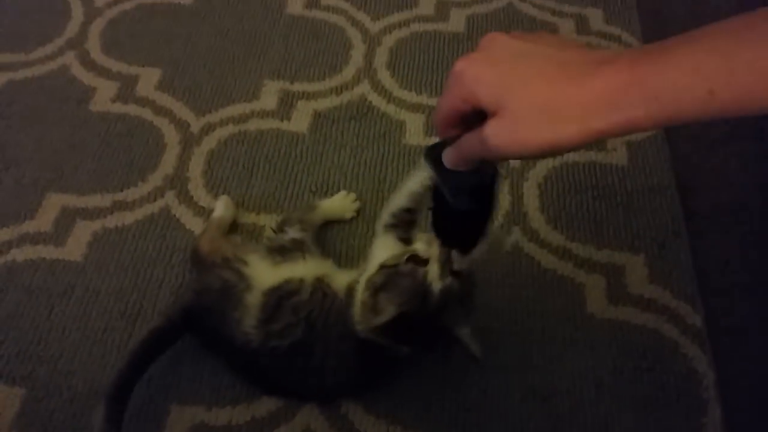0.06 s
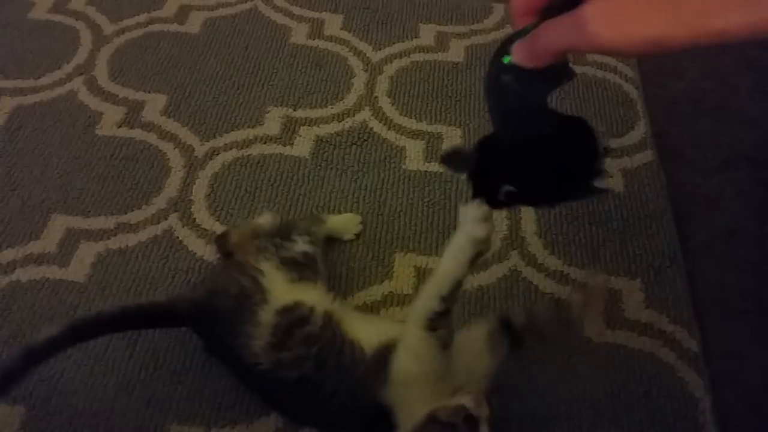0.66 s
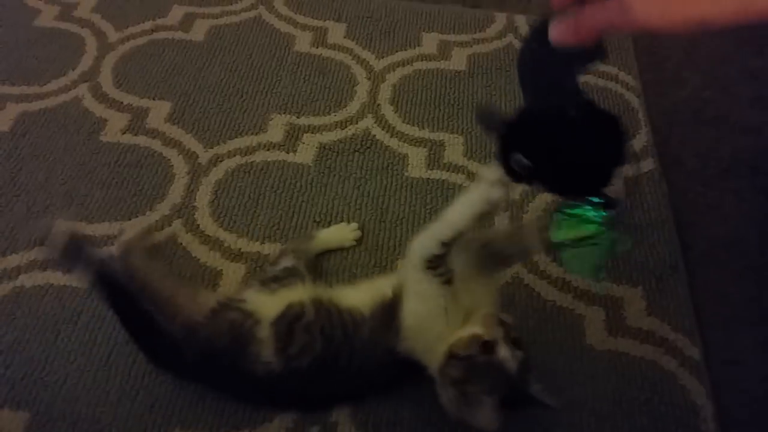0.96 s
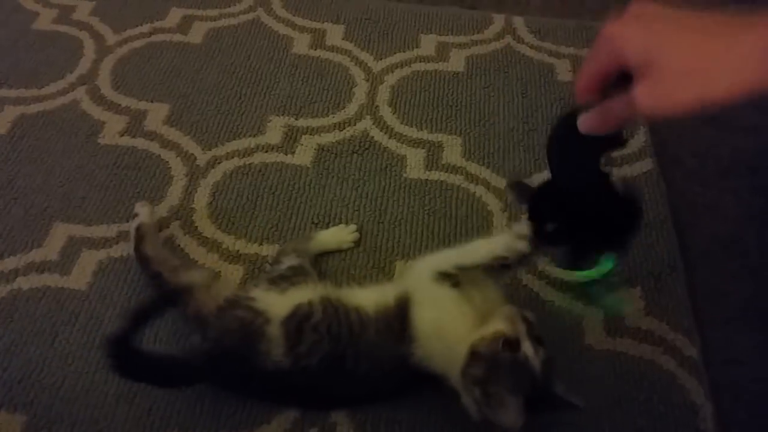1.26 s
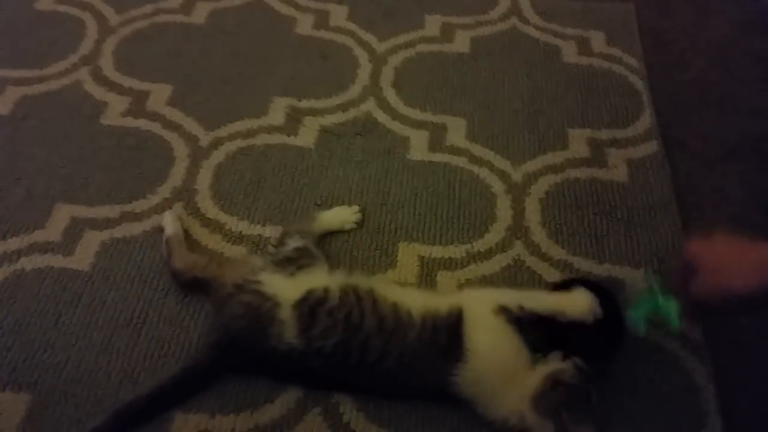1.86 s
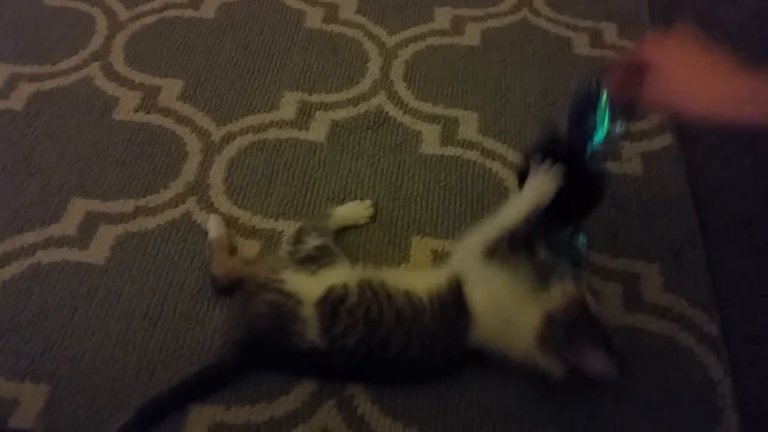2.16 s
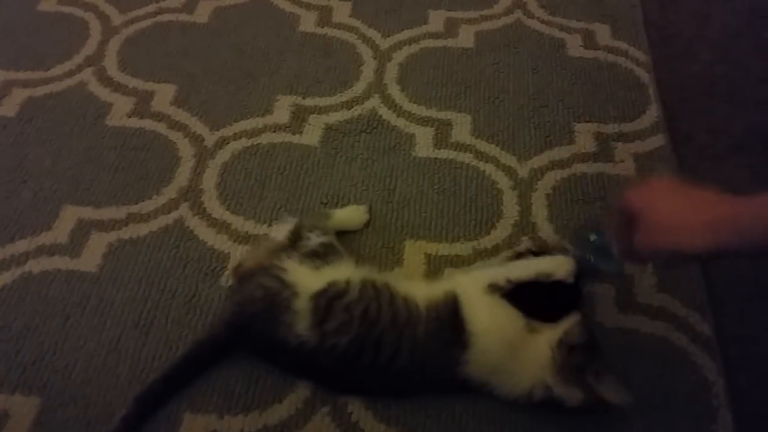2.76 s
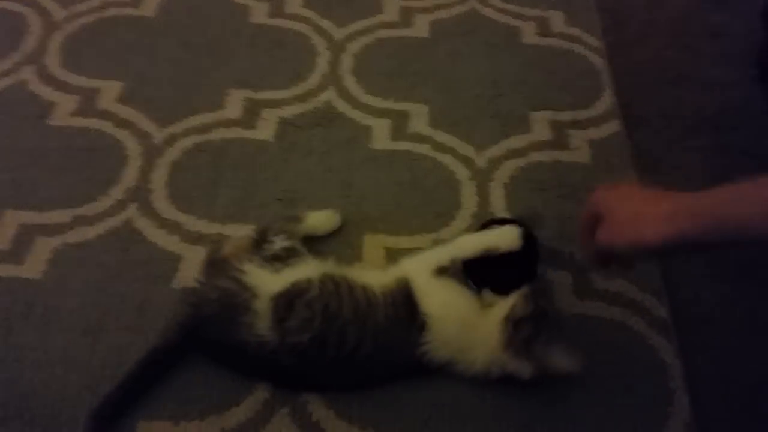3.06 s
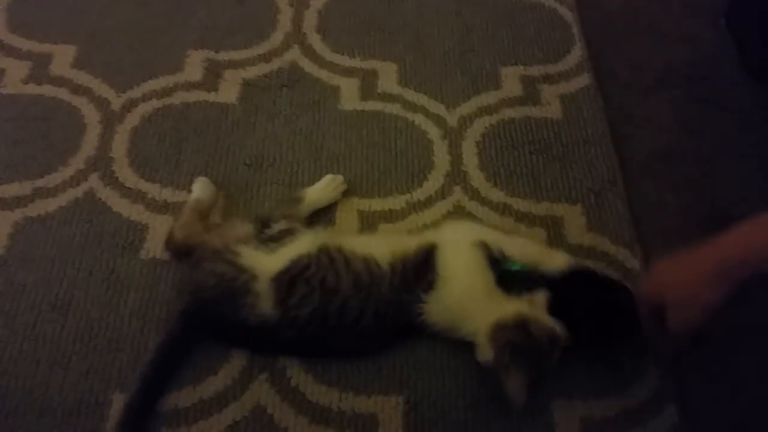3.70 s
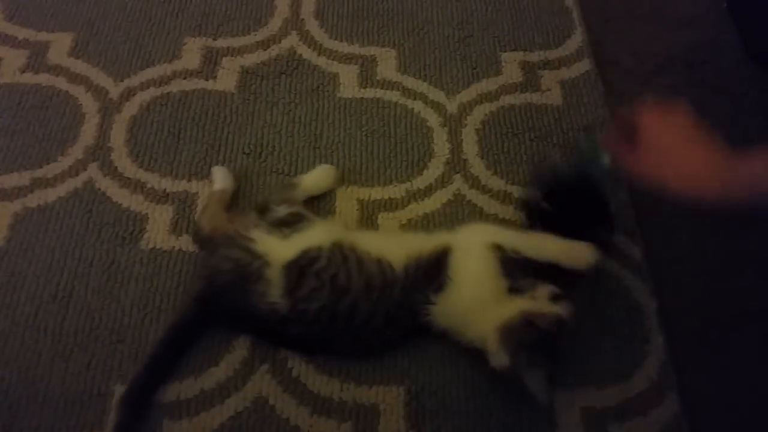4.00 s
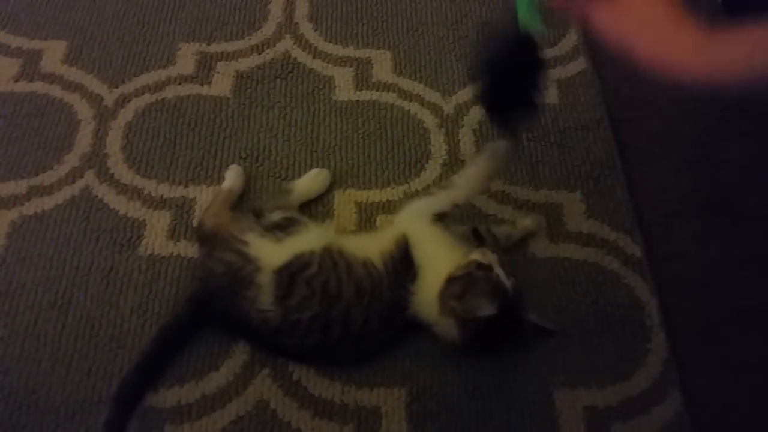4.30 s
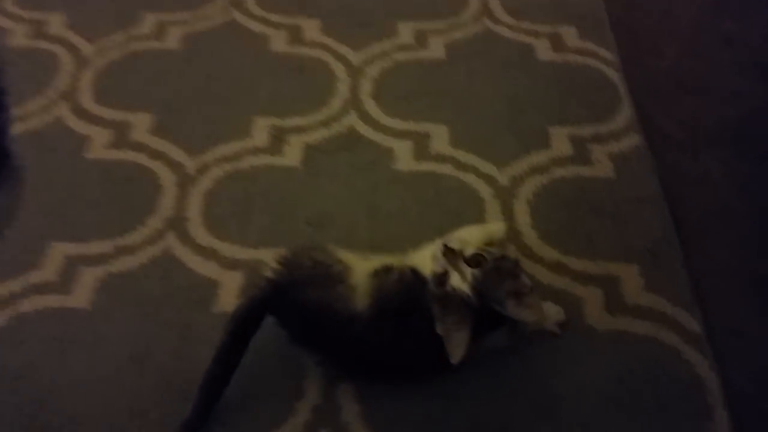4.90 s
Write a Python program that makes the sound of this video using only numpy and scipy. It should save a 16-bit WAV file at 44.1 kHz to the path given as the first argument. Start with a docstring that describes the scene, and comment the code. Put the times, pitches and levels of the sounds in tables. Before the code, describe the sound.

A kitten plays with a foil-winged toy on a rug, heard close up in a small living room. A sharp crinkle comes right at the start, followed by scattered bright snaps, light claw taps and a few small plastic clicks until about 1.6 seconds. From 1.7 seconds the foil crackles in quick, dense bursts, strongest between about 2.4 and 3 seconds, with fur and claws scuffing the rug and occasional soft, hollow paw knocks on the stuffed body. The crinkling loosens after 3.5 seconds. At 4 seconds the toy swings with a short, airy swish and a few more crackles. A plastic click follows near 4.4 seconds, then a fainter swish, isolated snaps and light taps until just past 5 seconds. A low ventilation rumble and faint hiss run throughout.

```python
"""Kitten wrestling a foil-winged toy

Close up, a kitten tugs a dangled toy on a rug. Each tug buckles the foil wings in sharp, ringing
snaps over a finer crackle, and swings slide them together in a swish. Claws tap the toy and ping its
plastic core, paws knock its stuffed body, fur scuffs on toy and rug. A small living room answers,
with ventilation rumble and a faint hiss behind."""
import sys
import numpy as np
from scipy import signal
from scipy.fft import rfft, irfft, next_fast_len
from scipy.io import wavfile
from scipy.ndimage import map_coordinates

SR = 44100
rng = np.random.default_rng(int(sys.argv[2]) if len(sys.argv) > 2 else 0)


def file_out(sig):
    """Save sig as 16-bit WAV at sys.argv[1]."""
    # one column per channel
    cols = np.atleast_2d(sig).T
    # limit, then scale
    lim = np.clip(cols, -1, 1)
    pcm = np.round(lim * 32767).astype(np.int16)
    wavfile.write(sys.argv[1], SR, pcm)


N = 227051

# fader ride on the ventilation: t/s, level/dB
VENT_RIDE = [(0, -34.5), (0.25, -38), (1.0, -36.5), (1.35, -38.5), (1.62, -36.5), (2.7, -37.5), (2.85, -40),
             (3.8, -43.5), (4.1, -43.5), (4.5, -40.5), (4.56, -38), (5.15, -36.5)]
# ventilation rumble EQ: f/Hz, level/dB
RUMBLE_EQ = [(12, -35), (22, -4.5), (33, -40), (53, -15), (66, -1.5), (86, -5), (108, 1), (135, -5.5),
             (162, -4.5), (180, -11.5), (210, -12.5), (340, -22.5), (600, -30.5), (1000, -57.5)]
# ventilation hiss EQ: f/Hz, level/dB
HISS_EQ = [(290, -13), (550, -1.5), (850, -4.5), (1300, -11), (1750, -16), (2050, -18.5), (3600, -26),
           (4650, -15.5), (5600, -31), (7500, -40), (9800, -23), (15500, -21)]
# ventilation tones: f/Hz, level/dB
HUM_TONES = [(118.4, -45), (193.8, -60.5)]
# how alike the ambience is left and right: f/Hz, correlation
STEREO_LIKENESS = [(60, 0.98), (140, 0.99), (260, 0.81), (500, 0.5), (1200, 0), (3000, 0)]
# pan of the action: t/s, left minus right/dB
PAN = [(0, -1.5), (1.2, -3), (2, -3), (3, -4), (4.4, -2.5), (4.56, -3), (4.88, 12), (5.15, 1)]
# tugs crumpling the foil: t/s, hold/s, level/dB
FOIL_TUGS = [(0.022, .03, -54), (0.519, 0.023, -53.5), (0.606, 0.027, -59), (1.037, 0.031, -63),
             (1.251, 0.054, -61), (1.383, .07, -62.5), (1.476, 0.027, -56), (1.625, .06, -62),
             (1.685, 0.062, -50.5), (1.802, 0.13, -49), (2.01, 0.035, -51), (2.096, 0.017, -43.5),
             (2.17, 0.078, -45.5), (2.31, 0.16, -45.5), (2.519, 0.12, -45.5), (2.661, 0.13, -54),
             (2.749, 0.069, -43.5), (2.83, 0.078, -44.5), (2.96, 0.093, -48.5), (3.095, 0.055, -50),
             (3.161, 0.12, -47.5), (3.402, 0.097, -51), (3.561, 0.15, -57), (3.973, 0.094, -52),
             (4.126, 0.058, -77), (4.27, 0.17, -66), (4.54, 0.018, -60.5), (4.85, 0.19, -61.5)]
# fine foil crackle EQ: f/Hz, level/dB
CRACKLE_EQ = [(500, -33), (1500, -17), (2300, -1.5), (3500, -0.5), (7500, -5.5), (9700, -0.5), (12000, -2),
              (15500, -6)]
# fur and claws scuffing toy and rug: t/s, level/dB
SCUFF_RIDE = [(0, -52), (0.35, -61), (0.62, -56), (0.8, -58), (1.15, -57), (1.3, -53.5), (1.6, -56.5),
              (1.75, -55), (2.3, -49), (2.5, -56), (2.66, -56), (2.78, -43), (3.0, -52.5), (3.45, -68),
              (3.7, -82), (4.05, -58), (4.3, -80), (5.15, -58)]
# scuff EQ: f/Hz, level/dB
SCUFF_EQ = [(200, 13), (500, 11.5), (900, 16), (1750, 12.5), (2200, -1), (4500, 4), (7000, -39),
            (16000, -17)]
# featured creases snapping through: t/s, ring level/dB, crack level/dB, ring f/Hz
FOIL_SNAPS = [(0.02, -44, -44, 10000), (0.028, -38.5, -43.5, 10300), (0.078, -50, -55, 15200),
              (0.2973, -57, -62, 10700), (0.519, -45, -49.5, 11900), (0.524, -42.5, -52, 12600),
              (0.543, -44, -50, 13400), (0.625, -42, -58, 11300), (0.6651, -40.5, -61, 8500),
              (0.9589, -46, -47, 13300), (1.0789, -40, -51.5, 15200), (1.1868, -25.5, -53, 10900),
              (1.273, -36.5, -47, 10200), (1.3106, -33.5, -56, 9900), (1.381, -46, -51, 9900),
              (1.395, -44, -53, 9400), (1.496, -42, -40, 10200), (1.502, -26.5, -43.5, 10300),
              (1.633, -36, -40, 11200), (1.701, -35, -43, 8900), (1.7188, -30, -30.5, 10400),
              (1.7616, -30.5, -50, 9200), (1.8117, -27.5, -31.5, 9900), (1.815, -36, -36, 12100),
              (1.8379, -34, -38, 9600), (1.844, -34, -37, 12100), (1.8559, -40, -37, 9200),
              (1.8637, -18.5, -59, 10900), (1.879, -22.5, -34, 10300), (1.912, -34, -36.5, 10300),
              (1.9183, -38, -36, 10200), (1.933, -37, -42, 12200), (1.94, -27.5, -35, 9700),
              (2.0172, -35, -34.5, 9600), (2.0278, -24.5, -31.5, 12800), (2.0906, -39, -34.5, 8400),
              (2.112, -43, -42, 14500), (2.1208, -44, -40, 10300), (2.19, -28.5, -35.5, 11170),
              (2.2358, -31.5, -34.5, 11500), (2.3444, -34, -35, 8660), (2.358, -35, -37, 8900),
              (2.3916, -25.5, -37, 9400), (2.4282, -28, -32, 10100), (2.4377, -29, -32, 10200),
              (2.456, -34.5, -32.5, 8800), (2.524, -25, -28, 9700), (2.5323, -26, -31, 13900),
              (2.5356, -24.5, -32, 10400), (2.5624, -28, -34, 9400), (2.5789, -27, -44, 9900),
              (2.587, -33, -37, 9700), (2.6034, -30, -31, 11380), (2.644, -55, -38, 10200),
              (2.763, -38, -42, 12200), (2.792, -28.5, -28.5, 12700), (2.8263, -27, -35, 10250),
              (2.8421, -27, -35, 9550), (2.8465, -26.5, -31.5, 9600), (2.864, -31, -43, 10300),
              (2.9027, -25.5, -34.5, 9100), (2.9082, -24.5, -33, 10000), (2.9157, -34, -35, 9400),
              (2.9608, -36, -38, 9030), (2.982, -31.5, -31.5, 9720), (2.9949, -25.5, -31, 14200),
              (3.0305, -31.5, -47, 9000), (3.0851, -31, -42, 12500), (3.088, -31, -35.5, 9600),
              (3.158, -23.5, -33, 10100), (3.1642, -27, -42, 9500), (3.1953, -32.5, -36.5, 9700),
              (3.224, -40, -41, 9400), (3.243, -34, -56, 13800), (3.2525, -28.5, -40, 9600),
              (3.2576, -31.5, -32, 10000), (3.2969, -37, -34.5, 10200), (3.3134, -31, -39, 11630),
              (3.344, -29.5, -37, 9700), (3.3578, -25.5, -42.5, 13900), (3.373, -34, -46, 13200),
              (3.4083, -31, -41.5, 12600), (3.4317, -34, -37, 9600), (3.4356, -25.5, -40.5, 12800),
              (3.4818, -33.5, -44, 14900), (3.51, -32.5, -42.5, 9700), (3.62, -38, -54, 10500),
              (3.661, -44, -65, 12560), (3.697, -35, -51, 11430), (3.7036, -33.5, -46, 14200),
              (3.8507, -34.5, -55, 14000), (3.8594, -40.5, -46.5, 10200), (3.9333, -47, -52, 11340),
              (4.0, -31, -50, 9900), (4.0146, -32.5, -37.5, 10100), (4.0657, -34.5, -42.5, 9900),
              (4.1384, -34, -45, 10100), (4.1666, -42, -38.5, 9800), (4.2034, -36.5, -55, 9800),
              (4.5519, -31, -42, 11400), (4.8821, -30, -35, 9500), (4.9486, -47, -51, 10100),
              (5.0082, -35, -49.5, 9100)]
# a snap's top layer, the bright ring: f/Hz, level/dB
RING_EQ = [(3000, -63), (7000, -16), (9000, 4.5), (12000, 3), (15500, 0)]
# a snap's middle layer, the crack: f/Hz, level/dB
CRACK_EQ = [(900, -25), (2300, -7.5), (3400, -0.5), (7500, 1), (9500, 1.5), (14000, -50.5)]
# a snap's low layer, the sheet's dull flex: f/Hz, level/dB
FLEX_EQ = [(200, -7), (600, -7.5), (1100, -1.5), (1700, 6.5), (2200, -4.5), (3200, -7.5), (6000, -52.5)]
# claws and teeth tapping the toy, duller than a snap: t/s, level/dB
CLAW_TAPS = [(0.024, -47), (0.2985, -50), (0.3476, -54.5), (0.3671, -53.5), (0.3872, -54.5),
             (0.4819, -47.5), (0.614, -47), (0.6456, -44.5), (0.6662, -47.5), (0.898, -55), (0.917, -54),
             (0.951, -45.5), (1.013, -53), (1.074, -49.5), (1.2615, -50), (1.272, -42.5), (1.306, -49),
             (1.3106, -41), (1.404, -48.5), (1.4915, -45.5), (1.705, -43.5), (1.7228, -44), (1.9336, -44.5),
             (2.1706, -47), (2.1894, -40), (2.3217, -39), (2.494, -37), (2.535, -37.5), (2.7522, -45.5),
             (2.7915, -42), (3.773, -49.5), (3.8221, -47.5), (4.1374, -45.5), (4.2033, -55.5),
             (4.2672, -53.5), (4.565, -55), (4.751, -49.5), (4.766, -54), (5.049, -52), (5.0792, -52),
             (5.105, -48), (5.136, -51.5)]
# claws pinging the hard plastic core: t/s, level/dB, f/Hz
CORE_CLICKS = [(0.0243, -47, 5050), (0.3028, -55.5, 4440), (0.653, -39.5, 4360), (1.0584, -49, 3700),
               (1.272, -39, 4700), (4.4092, -34, 4700), (5.1056, -40, 4010)]
# reverb send, lower when the toy is near: t/s, level/dB
ROOM_SEND = [(0, -8), (1.2, -11.5), (2, -9.5), (3.4, -10), (4.15, -10.5), (4.45, -6), (4.85, -15.5),
             (5.15, -15)]
# room decay: f/Hz, t60/s
ROOM_DECAY = [(300, 0.04), (2000, 0.46), (5000, 0.27), (10000, 0.26), (16000, 0.19)]
# the toy swung through the air: peak t/s, half width/s, level/dB
TOY_SWINGS = [(0.553, 0.03, -61), (4.008, 0.034, -40.5), (4.77, 0.041, -51.5)]
# EQ of the wings sliding over each other: f/Hz, level/dB
SWISH_EQ = [(2000, -53), (6000, -6), (10000, 8), (15500, 6)]
# paws knocking the toy's body: t/s, level/dB, f/Hz
PAW_KNOCKS = [(1.271, -34.5, 800), (1.3117, -46, 900), (1.813, -42, 655), (1.925, -40, 700),
              (2.643, -39, 980), (2.825, -32, 760), (3.296, -40.5, 868), (3.312, -42, 676),
              (3.478, -40.5, 920)]

TOP_HZ = 15950  # band limit of the mix
TUG_ATTACK_S, RELAX_DB_PER_S = .015, 230  # the foil tightens quickly and relaxes more slowly
RESTING_DB, SLACK_DB = -90, -62  # strain of the hanging toy; strain needed for small snaps
SMALL_PER_S, SMALL_SCATTER_DB = 45, 2  # small snaps: rate while tugged, level spread
SMALL_RING_DB, SMALL_CRACK_DB = 4.5, -5  # their ring against the strain, crack against the ring
RING_HZ, RING_SCATTER = 10500, 0.14  # the foil's usual ring; log spread among small snaps
CRACK_HZ, CRACK_SCATTER, CRACK_PEAK_DB = 6310, 0.11, 6.5  # crack resonance: pitch, log spread, height
FLEX_DB, TYPICAL_CRACK_DB = -51.5, -40  # the flex that goes with a typical crack
FLEX_GROWS, FLEX_SCATTER = 0.84, 0.12  # dB of flex per dB of crack; log pitch spread across the toy
TAP_RING_DB, TAP_CRACK_DB = -5, -5  # against the tap's flex
TAP_HZ, TAP_PEAK_DB = 4160, 13  # a tap's resonance
CLICK_RING_DB, CLICK_FLEX_DB, CLICK_PEAK_DB = -3, -15.5, 8.5  # two layers against the ping; its height


def amp(db):
    """Decibels to gain."""
    return 10 ** (np.asarray(db) / 20)


def unit(x):
    """Scale to rms 1."""
    return x / np.sqrt(np.mean(x ** 2) + 1e-20)


def along(points, hz):
    """Read (f/Hz, value) points on a log axis."""
    f, values = np.transpose(points)
    return np.interp(np.log(hz + 1), np.log(f + 1), values)


def ride(points):
    """An automation lane: (t/s, value) points to one value per sample."""
    return np.interp(np.arange(N) / SR, *np.transpose(points))


def wobble(rate):
    """A smooth random curve, rate knots a second."""
    return map_coordinates(rng.standard_normal(int(N * rate / SR) + 4), [np.arange(N) * rate / SR])


def filtered(x, response):
    """Filter x by a gain given as a function of frequency."""
    size = next_fast_len(N + SR // 2)
    return irfft(rfft(x, size) * response(np.fft.rfftfreq(size, 1 / SR)), size)[..., :N]


def coloured(x, eq):
    """x through an EQ curve, at rms 1."""
    return unit(filtered(x, lambda hz: amp(along(eq, hz))))


def minimum_phase(gain):
    """The response with this gain that starts at once and rings afterwards."""
    cepstrum = irfft(np.log(gain + 1e-6))
    half = cepstrum.shape[-1] // 2
    return np.exp(rfft(cepstrum * np.r_[1, np.full(half - 1, 2), 1, np.zeros(half - 1)]))


def resonance(hz, centre_hz, width_hz, peak_db):
    """A bell boost, in dB."""
    return 10 * np.log10(1 + amp(2 * peak_db) / (1 + ((hz - centre_hz) / width_hz) ** 2) ** 2)


def panned(x):
    """Pan x after the action at constant power."""
    lean_db = ride(PAN)
    return x * amp([lean_db / 2, -lean_db / 2]) / np.sqrt((amp(lean_db) + amp(-lean_db)) / 2)


def diffuse(eq):
    """Noise of rms 1, near mono in the bass and wide in the treble."""
    def mid_side_gain(hz):
        width = np.arccos(np.clip(along(STEREO_LIKENESS, hz), -1, 1)) / 2
        return amp(along(eq, hz)) * [np.cos(width), np.sin(width)]

    mid, side = filtered(rng.standard_normal((2, N)), mid_side_gain)
    return unit(np.array([mid + side, mid - side]))


def grains(rate, spread_db, t60, size=256):
    """Stereo ticks at random moments and of random sizes, each with a short noisy shiver."""
    ticks = (rng.random(N) < rate / SR) * rng.choice([-1, 1], N)
    ticks = ticks * amp(spread_db * np.clip(rng.standard_normal(N), -2, 2))
    shiver = rng.standard_normal((2, size)) * amp(-60 * np.arange(size) / SR / t60)
    envelope = np.sqrt(abs(signal.fftconvolve(ticks[None] ** 2, shiver ** 2, axes=1)[:, :N]))
    return unit(unit(ticks) + unit(envelope * rng.standard_normal((2, N))))


def ventilation(rumble_db, hum_db, hiss_db):
    """The bed: air rumble, two wavering tones and hiss, all dipping and swelling together."""
    t, level_db = np.arange(N) / SR, ride(VENT_RIDE)
    swell_db = level_db - np.median(level_db)
    tones = sum(amp(db) * np.sqrt(2) * np.sin(2 * np.pi * hz * t + 0.85 * wobble(6))
                for hz, db in HUM_TONES)
    hum = amp(swell_db + hum_db) * tones
    rumble = amp(level_db + rumble_db) * diffuse(RUMBLE_EQ)
    hiss = amp(swell_db + hiss_db) * diffuse(HISS_EQ)
    return (rumble + hum + hiss) * amp([[-.5], [.5]])  # leans slightly right


def strain():
    """How hard the foil is crumpled, in dB: every tug rises, holds and relaxes."""
    t, tugs = np.arange(N) / SR, []
    for s, hold, db in FOIL_TUGS:
        attack = np.clip((t - s) / TUG_ATTACK_S + .5, 0, 1)
        tugs.append(attack * amp(db - RELAX_DB_PER_S * np.maximum(t - s - hold, 0)))
    return 20 * np.log10(np.max(tugs, axis=0) + amp(RESTING_DB))


def rustle(crackle_db, scuff_db):
    """Tiny creases crackle in the strained foil while fur and claws catch on fibres."""
    crackle = coloured(grains(rate=240, spread_db=1.5, t60=0.023), CRACKLE_EQ)
    scuff = coloured(grains(rate=370, spread_db=4, t60=0.0072), SCUFF_EQ)
    return panned(amp(strain() + crackle_db) * crackle + amp(ride(SCUFF_RIDE) + scuff_db) * scuff)


def crease(s, ring_db, crack_db, ring_hz):
    """Cue for one crease giving way: the harder it cracks, the more the sheet flexes."""
    flex_db = FLEX_DB + FLEX_GROWS * (crack_db - TYPICAL_CRACK_DB)
    crack_hz = CRACK_HZ * np.exp(CRACK_SCATTER * rng.standard_normal())
    return s, ring_db, crack_db, flex_db, ring_hz, crack_hz, CRACK_PEAK_DB


def hit_cues(count=400):
    """Snaps, taps and clicks: t/s, ring/dB, crack/dB, flex/dB, ring f/Hz, crack f/Hz, crack peak/dB."""
    cues = [crease(*row) for row in FOIL_SNAPS]
    cues += [(s, db + TAP_RING_DB, db + TAP_CRACK_DB, db, RING_HZ, TAP_HZ, TAP_PEAK_DB)
             for s, db in CLAW_TAPS]
    cues += [(s, db + CLICK_RING_DB, db, db + CLICK_FLEX_DB, RING_HZ, hz, CLICK_PEAK_DB)
             for s, db, hz in CORE_CLICKS]
    # small random snaps fill in wherever the foil is taut
    times = (np.arange(count) + rng.random(count)) / SMALL_PER_S
    strains = np.interp(times, np.arange(N) / SR, strain(), right=RESTING_DB)
    for s, db, (strength, bite, pitch) in zip(times, strains, rng.standard_normal((count, 3))):
        ring_db = db + SMALL_RING_DB + SMALL_SCATTER_DB * strength
        crack_db = ring_db + SMALL_CRACK_DB + SMALL_SCATTER_DB * bite
        small_snap = crease(s, ring_db, crack_db, RING_HZ * np.exp(RING_SCATTER * pitch))
        if db > SLACK_DB:
            cues.append(small_snap)
    return cues


def snaps_and_taps(crack_db, flex_db, lead_in, rise_s, shiver, t60, size=640, max_hits=512):
    """One kick and a brief shiver of the sheet excite a ring, a crack and a dull flex."""
    lead, body_samples = size // 5, 120  # a layer's level is its rms as if spread over body_samples
    t, hz = (np.arange(size) - lead) / SR, np.fft.rfftfreq(size, 1 / SR)
    # each hit has a faint, short swell of noise before its sharp attack
    envelope = np.where(t < 0, lead_in * amp(-60 * abs(t) / rise_s), shiver * amp(-60 * abs(t) / t60))
    out = np.zeros((2, N + 2 * size))
    for cue, noise in zip(hit_cues(), rng.standard_normal((max_hits, 3, size))):
        s, ring, crack, flex, ring_hz, crack_hz, peak_db = cue
        kick = (t == 0) + envelope * (noise[0] + noise[1:])  # centre noise plus one for each side
        # a facet that flips alone, with little crack from the sheet, rings purer
        purity_db = 4 + 1.3 * max(ring - crack - 16, 0)
        ring_eq = along(RING_EQ, hz) + resonance(hz, ring_hz, width_hz=1050, peak_db=purity_db)
        crack_eq = along(CRACK_EQ, hz) + resonance(hz, crack_hz, width_hz=740, peak_db=peak_db)
        flex_eq = along(FLEX_EQ, hz * np.exp(FLEX_SCATTER * rng.standard_normal()))
        spectrum = 0
        for eq, db in [(ring_eq, ring), (crack_eq, crack + crack_db), (flex_eq, flex + flex_db)]:
            layer = rfft(kick) * minimum_phase(amp(eq))
            energy = np.sum(abs(layer[:, hz < TOP_HZ]) ** 2, axis=1, keepdims=True) * 2 / size
            spectrum = spectrum + amp(db) * layer * np.sqrt(body_samples / energy)
        lag_s = .95 / SR * np.interp(s, *np.transpose(PAN))  # the far side hears it later
        for channel, wave, delay in zip(out, irfft(spectrum), (-lag_s / 2, lag_s / 2)):
            start = max(round((s + delay) * SR) - lead, 0)
            channel[start:start + size] += wave
    return panned(out[:, :N])


def room(x, tails=6, switches_per_s=20, onset_s=.012):
    """The rug swallows the first bounce; walls answer after a gap. Rotating tails suggest movement."""
    send = x * amp(ride(ROOM_SEND))
    active_tail = np.floor(np.arange(N) / SR * switches_per_s) % tails
    out = np.zeros((2, N))
    for k in range(tails):
        hz, age, noise = signal.stft(rng.standard_normal((2, SR // 2)), SR, nperseg=256)
        decay = amp(-60 * age / along(ROOM_DECAY, hz)[:, None])
        tail = signal.istft(noise * decay, SR, nperseg=256)[1]
        tail *= np.clip(np.arange(tail.shape[1]) / SR / onset_s * 2 - 1, 0, 1)  # pre-delay, fade-in
        tail /= np.linalg.norm(tail[0])
        out += signal.fftconvolve(send * (active_tail == k), tail, axes=1)[:, :N]
    return out


def swishes():
    """Each swing slides the wings over each other in an airy swish of very fine ticks."""
    t = np.arange(N) / SR
    level = sum(amp(db) * np.exp(-((t - s) / half_width) ** 2) for s, half_width, db in TOY_SWINGS)
    return panned(level * coloured(grains(rate=2200, spread_db=11, t60=0.0085), SWISH_EQ))


def paw_knocks(gain_db, t60, attack_s=0.0011, size=2048):
    """The stuffed body gives a hollow knock that dies within a few cycles."""
    t, out = np.arange(size) / SR, np.zeros(N + size)
    envelope = (1 - np.exp(-t / attack_s)) * amp(-60 * t / t60)
    for s, db, hz in PAW_KNOCKS:
        out[round(s * SR):][:size] += amp(db + gain_db) * envelope * np.sin(2 * np.pi * hz * t)
    return panned(out[:N])


def scene():
    """The mix: the toy up front, its room reverb, the ventilation bed underneath."""
    toy = snaps_and_taps(crack_db=1.5, flex_db=4.0, lead_in=.07, rise_s=0.0061, shiver=.085, t60=.009)
    toy += paw_knocks(gain_db=8.5, t60=0.011)
    toy += rustle(crackle_db=0.5, scuff_db=-5.5)
    toy += swishes()
    return toy + room(toy) + ventilation(rumble_db=-0.5, hum_db=-1.5, hiss_db=-58.0)


def record(dry):
    """A brick-wall low-pass on the master."""
    return filtered(dry, lambda hz: hz < TOP_HZ)


dry = scene()
out = record(dry)
file_out(out)
```